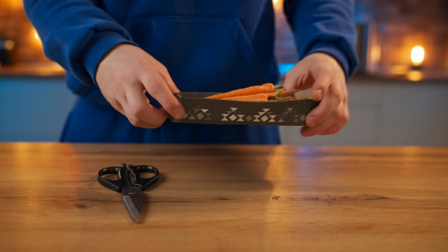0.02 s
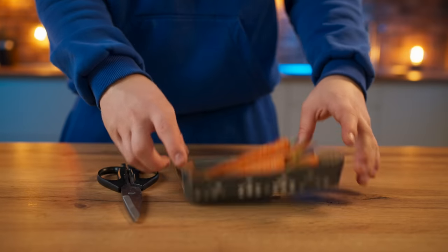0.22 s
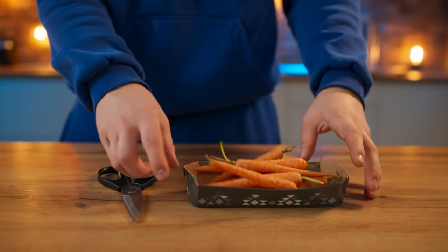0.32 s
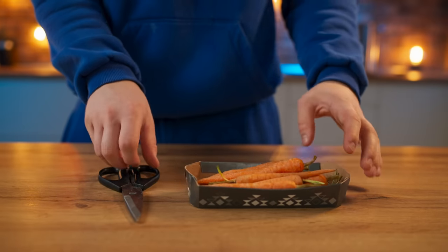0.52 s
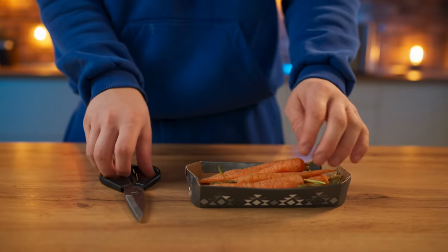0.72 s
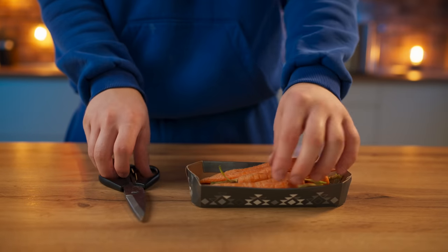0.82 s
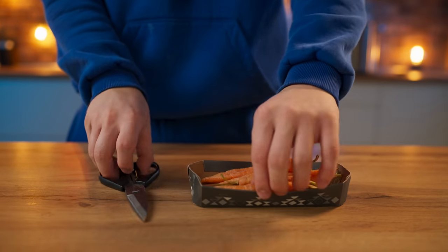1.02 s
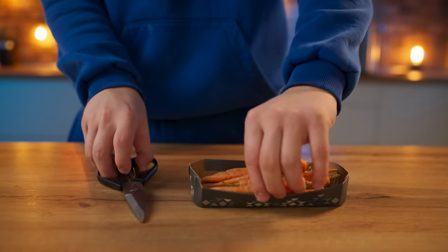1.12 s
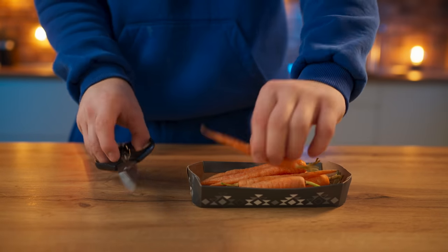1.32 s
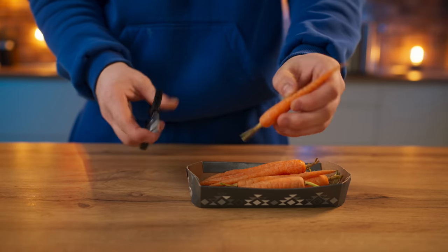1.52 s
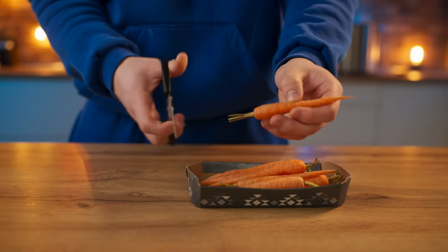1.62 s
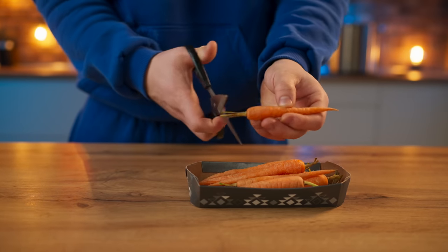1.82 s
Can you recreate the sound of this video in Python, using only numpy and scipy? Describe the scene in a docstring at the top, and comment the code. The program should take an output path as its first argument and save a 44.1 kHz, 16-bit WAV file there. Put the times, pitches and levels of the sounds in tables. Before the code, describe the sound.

Tray of carrots lands with a hard clatter on wood, carrots knock, scissors scrape and snick

```python
"""Fingers rustle in a quiet room with mains hum, then a card tray of carrots drops on a wooden kitchen
table close to the microphone. Carrots roll and knock in the tray; scissors are dragged off and opened.
Noise bursts make clatter, ticks and a few low knocks, random impulses make rolling and grit, and decaying
modes make the wood and steel ring. The room answers with a diffuse echo, and the input stage flattens
the loudest peaks."""
import sys
import numpy as np
from scipy import signal
from scipy.fft import rfft, irfft
from scipy.io import wavfile
from scipy.ndimage import uniform_filter1d

SR = 44100
rng = np.random.default_rng(int(sys.argv[2]) if len(sys.argv) > 2 else 0)


def magnitude_from_level(level_db):
    """Linear magnitude for a level in decibels (20 dB per decade)."""
    exponent = np.asarray(level_db, float) / 20
    return 10 ** exponent


def file_out(sig):
    """Save sig as 16-bit WAV at sys.argv[1]."""
    # one column per channel
    cols = np.atleast_2d(sig).T
    # limit, then scale
    lim = np.clip(cols, -1, 1)
    pcm = np.round(lim * 32767).astype(np.int16)
    wavfile.write(sys.argv[1], SR, pcm)


N = 83790
T = np.arange(N) / SR  # seconds

# Ringing modes of the table and tray. Each row: frequency in Hz, gain in dB, t60 in seconds.
TABLE_MODES = [(128, -3.5, 0.38), (244.6, -6.5, 0.37), (272.3, -0.5, 0.14), (332.1, -3.5, .15),
               (556, -2, 0.043), (679, -14, 0.25), (940, -9.5, 0.1), (1120, -6, 0.069), (1600, -8.5, .05),
               (2140, -10, .04), (3340, -8.5, .04), (3770, -9, .04)]
# Grit under sliding blades and rubbing fingers: mean grains per second, spread of their levels in dB.
GRIT_PER_S, GRIT_SPREAD_DB = 430, 8
LOW_CUT_HZ = 80  # for the thumps and the echo


def unit(x):
    """Scale to rms 1."""
    return x / np.sqrt(np.mean(x ** 2) + 1e-30)


def colour(x, table, tilt_db=0.):
    """Filter by (Hz, dB) points plus a tilt in dB per octave, keeping the power of white noise."""
    hz, db = np.array(table, float).T
    f = np.maximum(np.arange(N // 2 + 1) * SR / N, 10)
    shape_db = np.interp(np.log(f), np.log(hz), db) + tilt_db * np.log2(f / 4000)
    return irfft(rfft(x) * unit(magnitude_from_level(shape_db)), N)


def band(x, hz, width_hz):
    """One resonance, passed twice, with gain 1 at the centre; the width is that of a single pass."""
    b, a = signal.iirpeak(min(hz, .45 * SR), hz / width_hz, SR)
    return signal.lfilter(b, a, signal.lfilter(b, a, x))


def low_cut(x, hz):
    """Take away the rumble below hz."""
    return signal.sosfilt(signal.butter(2, hz, "high", fs=SR, output="sos"), x)


def fade(t0, t60):
    """Sudden start, exponential fall by 60 dB in t60 seconds."""
    return (T >= t0) * magnitude_from_level(-60 * np.clip(T - t0, 0, 9) / t60)


def strike(t0, t60):
    """Very short rise, exponential fall."""
    attack_s = .0003
    return np.clip((T - t0) / attack_s, 0, 1) ** 2 * fade(t0, t60)


def curve(rows, axis=1):
    """Gain from one dB column of a table that starts with time; nearly silent outside."""
    t, db = np.array(rows, float).T[[0, axis]]
    times = np.r_[t[0] - .05, t, t[-1] + .05]
    return magnitude_from_level(np.interp(T, times, np.r_[-100, db, -100]))


def wander(size):
    """Slow random drift with rms 1: noise averaged twice over size samples."""
    return unit(uniform_filter1d(uniform_filter1d(rng.standard_normal(N), size), size))


def grains(per_s, spread_db):
    """Random impulses of either sign, a few much larger than the rest, scaled to rms 1."""
    hit = rng.random(N) < per_s / SR
    size_db = spread_db * np.minimum(rng.exponential(size=N), 3)
    return unit(hit * magnitude_from_level(size_db) * np.sign(rng.standard_normal(N)))


def impulse(t, db):
    """One sample of the given level at t seconds."""
    return magnitude_from_level(db) * (np.arange(N) == int(t * SR))


def push(x, s):
    """A soft contact spreads an impulse in time: two one-pole smoothers of time constant s seconds."""
    p = np.exp(-1 / (s * SR))
    return signal.lfilter([(1 - p) ** 2], np.convolve([1, -p], [1, -p]), x)


def ring(x, modes=TABLE_MODES):
    """Ring the modes of an object as decaying sines, by default table and tray."""
    out = 0
    for hz, db, t60 in modes:
        r = magnitude_from_level(-60 / (t60 * SR))  # decay per sample
        w = 2 * np.pi * hz / SR
        out = out + magnitude_from_level(db) * signal.lfilter([0, np.sin(w)], [1, -2 * r * np.cos(w), r * r], x)
    return out


def background():
    """Mains hum that wavers a little over steady air noise."""
    air_db, hum_waver_db = -69, 1.2
    # Colour of the air noise. Each row: frequency in Hz, relative level in dB per Hz.
    air_colour = [(20, -21.5), (40, -5.5), (70, -5), (110, -4), (200, -2.5), (330, -5.5), (900, -11),
                  (1400, -18.5), (3800, -21.5), (5000, -25.5), (10000, -31.5), (16500, -37)]
    # Mains hum. Each row: frequency in Hz, level in dB rms before it wavers.
    hum = [(50, -72.5), (150, -68.5)]
    out = magnitude_from_level(air_db) * colour(rng.standard_normal(N), air_colour)
    for hz, db in hum:
        level = np.sqrt(2) * magnitude_from_level(db + hum_waver_db * wander(size=2500))
        out = out + level * np.sin(2 * np.pi * (hz * T + rng.random()))
    return out


def rustles():
    """Fingers and sleeves rub: flickering noise with fine grit, in swells."""
    grit_db, flicker_db = -8, 2.5  # grit against smooth noise; rms of the flicker
    # Rubs. Each row: start in seconds, length in seconds, level in dB, tilt in dB per octave.
    rubs = [(0.012, 0.19, -63, -6.5), (0.109, 0.11, -64.5, -2.5), (0.625, 0.11, -68, -1),
            (0.867, 0.053, -61, -4.5), (0.98, 0.46, -78, 8), (1.091, 0.064, -65, -2),
            (1.286, 0.05, -69.5, 2), (1.302, 0.37, -68.5, 1), (1.486, 0.085, -62, 4), (1.504, 0.38, -74, 0)]
    # Colour of the rubbing before tilt. Each row: frequency in Hz, relative level in dB per Hz.
    rub_colour = [(400, -26.5), (900, -8), (1900, -1), (2700, -2.5), (3700, 2), (5300, -9.5), (7200, -6),
                  (9500, -6), (11200, -10), (12800, -7.5), (14300, -14), (15600, -10), (17000, -31)]
    grit = magnitude_from_level(grit_db) * grains(GRIT_PER_S, GRIT_SPREAD_DB)
    rubbing = unit(grit + rng.standard_normal(N)) * magnitude_from_level(flicker_db * wander(size=150))
    out = 0
    for t, length, db, tilt_db in rubs:
        swell = np.sin(np.pi * np.clip((T - t) / length, 0, 1)) ** 1.2
        out = out + magnitude_from_level(db) * swell * colour(rubbing, rub_colour, tilt_db)
    return out


def ticks_and_knocks():
    """Ticks of scissors, stalks and card, with a few dull low knocks: noisy bursts, each around its own centre."""
    # Each row: time in seconds, level in dB, centre in Hz, width of one filter pass in Hz, t60 in seconds.
    bursts = [(0.102, -55.5, 746, 585, 0.049), (.168, -38.5, 1770, 1800, 0.0048),
              (0.4, -50.5, 7400, 7800, 0.017), (0.55, -49, 277, 200, 0.13),
              (0.5513, -54.5, 8000, 10000, 0.022), (0.597, -52, 807, 867, 0.048),
              (.671, -56, 1520, 990, 0.04), (0.684, -59, 3460, 4000, .015),
              (0.7326, -52.5, 3030, 3930, 0.1), (0.747, -55, 3800, 4840, 0.025),
              (0.7778, -21.5, 8600, 12200, 0.0041), (0.7795, -34.5, 1430, 1520, 0.01),
              (0.8101, -37.5, 3900, 7800, 0.016), (0.9742, -38, 4865, 10000, 0.0026),
              (0.993, -48, 3870, 4870, 0.0093), (1.098, -64, 3300, 2014, 0.016),
              (1.125, -61, 5000, 9000, 0.014), (0.928, -50.5, 900, 1200, 0.029),
              (1.1903, -57, 2200, 3500, 0.0071), (1.1881, -58, 10000, 4000, 0.0069),
              (1.2106, -56.5, 2180, 4900, 0.024), (1.223, -63.5, 2460, 2460, 0.13),
              (1.287, -62.5, 2750, 1790, 0.05), (1.292, -59, 2170, 817, 0.031),
              (1.311, -66, 2880, 2470, 0.082), (1.531, -52.5, 2560, 2520, 0.035),
              (1.607, -57, 2503, 4050, 0.027), (1.616, -39.5, 2760, 2510, 0.0062)]
    out = 0
    for t, db, hz, width_hz, t60 in bursts:
        noise = unit(band(rng.standard_normal(N), hz, width_hz))
        out = out + magnitude_from_level(db) * strike(t, t60) * noise
    return out


def landing():
    """The tray's touches clatter briefly and set the table ringing; the carrots rattle on."""
    ring_db, push_s = -18, 0.000077  # blow on the table against the clatter; contact time constant
    rattle_s, rattle_db, rattle_t60_s = .245, -22.5, 0.33  # carrots shaking after the landing
    # Touches of the tray. Each row: time in seconds, level in dB, clatter t60 in seconds,
    # tilt in dB per octave.
    touches = [(.225, -25, .08, -3), (.2316, -19, .05, 1), (.2349, -5, .035, 1), (.2385, -8, .05, -1)]
    # Colour of the clatter before tilt. Each row: frequency in Hz, relative level in dB per Hz.
    clatter_colour = [(40, -15), (110, -1), (250, -0.5), (340, -6.5), (600, -11.5), (1100, -1), (1650, -1),
                      (2150, 0), (2700, -6.5), (3600, 0), (4700, -13.5), (7000, -17), (16000, -29)]
    # Colour of the shaking carrots. Each row: frequency in Hz, relative level in dB per Hz.
    rattle_colour = [(60, -11), (300, 2.5), (1500, 2), (5000, -15.5), (16000, -43.5)]
    blows, clatter = 0, 0
    for t, db, t60, tilt_db in touches:
        noise = colour(rng.standard_normal(N), clatter_colour, tilt_db)
        clatter = clatter + magnitude_from_level(db) * strike(t, t60) * noise
        blows = blows + impulse(t, db + ring_db)
    rattle = colour(rng.standard_normal(N), rattle_colour)
    rattle = magnitude_from_level(rattle_db) * fade(rattle_s, rattle_t60_s) * rattle
    return clatter + rattle + ring(push(blows, push_s))


def carrots():
    """Dense dull knocks, partly through the table modes, and the scuffing of carrot skins on card."""
    per_s, spread_db, push_s, knock_t60_s = 900, 2.5, .0004, .04
    ring_db, ring_cut_hz = -9, 190  # table ring against the knocks, and its low cut
    # Rolling and knocking. Each row: time in seconds, level of the knocks in dB,
    # level of the brighter scuffing in dB.
    rolling = [(0.53, -67, -86.5), (0.56, -47.5, -57), (0.584, -52, -99), (0.632, -45, -91),
               (0.722, -63, -95), (0.738, -53, -53), (0.774, -39, -54), (0.78, -37.5, -40),
               (0.88, -53.5, -66), (0.962, -56, -85), (0.994, -49, -52), (1.01, -54, -66),
               (1.084, -63.5, -73.5), (1.116, -58, -69), (1.17, -69, -72), (1.226, -57, -79),
               (1.252, -105, -96)]
    # Colour of the knocks. Each row: frequency in Hz, relative level in dB per Hz.
    knock_colour = [(30, -70), (70, -38), (120, -1.5), (180, -9), (280, -1), (410, -13.5), (510, 0),
                    (600, -6), (700, -7), (1200, -24), (4000, -57)]
    # Colour of the scuffing. Each row: frequency in Hz, relative level in dB per Hz.
    scuff_colour = [(400, -26.5), (800, -8.5), (1050, -2.5), (1500, 6.5), (2000, -7), (3000, -13),
                    (6000, -34)]
    hits = grains(per_s, spread_db)
    # every hit starts a decaying burst of noise
    power = signal.fftconvolve(hits ** 2, fade(0, knock_t60_s)[:SR // 10] ** 2)[:N]
    bursts = np.sqrt(np.abs(power)) * rng.standard_normal(N)
    rung = low_cut(ring(push(hits, push_s)), ring_cut_hz)
    knocks = unit(unit(colour(bursts, knock_colour)) + magnitude_from_level(ring_db) * unit(rung))
    scuffing = unit(colour(bursts, scuff_colour))
    return curve(rolling) * knocks + curve(rolling, axis=2) * scuffing


def thumps():
    """Dull thumps of hands and carrots: soft pushes into the table modes."""
    # Each row: time in seconds, level of the impulse in dB, time constant of the push in seconds.
    pushes = [(0.559, -51, 0.00028), (0.611, -55, 0.0013), (0.636, -48, 0.0012), (0.744, -58, 0.00035),
              (0.783, -54, 0.0018), (0.798, -47.5, 0.00065), (0.976, -46, 0.00063)]
    blows = sum(push(impulse(t, db), push_s) for t, db, push_s in pushes)
    return low_cut(ring(blows), LOW_CUT_HZ)


def steel():
    """Clinks ring the steel; as blade rubs on blade the moving contact stirs now one mode, now another."""
    contact_db = 4  # rms of the wander in drive to each mode
    # Modes of the scissor steel. Each row: frequency in Hz, gain in dB, t60 in seconds.
    steel_modes = [(3900, -6.5, 0.049), (5032, -7, 0.015), (6700, -5, .015), (7370, -10, 0.023),
                   (8330, 3.5, 0.01), (9600, -4, 0.01), (10100, -6, .015), (10900, -4.5, 0.014),
                   (12500, -1.5, .015), (14300, -9.5, .012), (15300, -11, .012)]
    # The blades clink. Each row: time in seconds, level of the impulse in dB.
    clinks = [(0.7763, -31.5), (.8095, -63), (1.6152, -48.5)]
    # Blade slides on blade as the scissors open. Each row: time in seconds, level in dB.
    opening = [(1.495, -70), (1.51, -58), (1.519, -52), (1.527, -59), (1.555, -70)]
    blows = sum(impulse(t, db) for t, db in clinks)
    rub = rng.standard_normal(N)
    shimmer = sum(ring(magnitude_from_level(contact_db * wander(size=300)) * rub, [mode]) for mode in steel_modes)
    return ring(blows, steel_modes) + curve(opening) * unit(shimmer)


def scissors():
    """Scissors slide on wood: gritty friction through the blade resonances."""
    # Sliding. Each row: time in seconds, level in dB.
    sliding = [(0.88, -71), (0.966, -72), (0.974, -49), (1.002, -61.5), (1.082, -65.5), (1.106, -56),
               (1.126, -52), (1.14, -70.5), (1.25, -77)]
    # Blade resonances. Each row: centre in Hz, width of one filter pass in Hz, relative level in dB.
    blades = [(1490, 750, -3.5), (2060, 190, -5), (3380, 620, 1.5), (5600, 910, -9.5), (10000, 5400, -19)]
    grit = grains(GRIT_PER_S, GRIT_SPREAD_DB) + rng.standard_normal(N)
    friction = sum(magnitude_from_level(db) * unit(band(grit, hz, width_hz)) for hz, width_hz, db in blades)
    return curve(sliding) * unit(friction)


def room(x):
    """Diffuse echo from decaying noise; bands a third of an octave apart die at their own rates."""
    echo_db, delay_s, tilt_db = -16, 0.0088, -2.5  # tilt per octave
    # Decay of the room. Each row: frequency in Hz, t60 in seconds.
    decay = [(60, 0.11), (200, 0.61), (500, 0.6), (1200, 0.63), (2500, .38), (5000, 0.52), (9000, 0.63),
             (15000, .16)]
    hz, t60 = np.array(decay).T
    response = 0
    for f in 50 * 2 ** np.arange(0, 8.5, 1 / 3):
        noise = band(rng.standard_normal(N), f, f / 2)
        tail = fade(delay_s, np.interp(np.log(f), np.log(hz), t60))
        response = response + noise * magnitude_from_level(tilt_db * np.log2(f / 1000)) * tail
    response = response / np.sqrt(np.sum(response ** 2))
    return magnitude_from_level(echo_db) * signal.fftconvolve(x, response)[:N]


def scene():
    """Everything on the table close to the microphone, its echo, and the background."""
    near = rustles() + ticks_and_knocks() + landing() + carrots() + thumps() + steel() + scissors()
    echo = low_cut(room(near), LOW_CUT_HZ)
    return (near + echo + background())[None]


def low_pass(x):
    """Removes everything above the highest recorded frequency."""
    return signal.sosfilt(signal.butter(12, 16850, fs=SR, output="sos"), x)


def record(dry):
    """The input stage flattens the loudest peaks and cuts the top."""
    ceiling, top_hz = .49, 16300
    flattened = dry / (1 + np.abs(dry / ceiling) ** 4) ** 0.22
    mix = signal.sosfilt(signal.ellip(8, .2, 70, top_hz, fs=SR, output="sos"), flattened)
    return low_pass(mix)


dry = scene()
out = record(dry)
file_out(out)
```